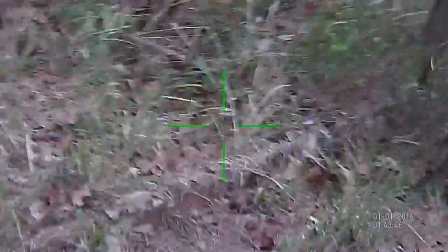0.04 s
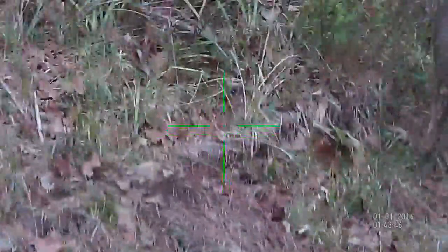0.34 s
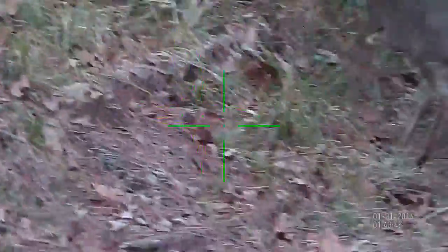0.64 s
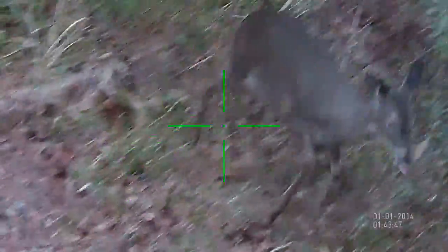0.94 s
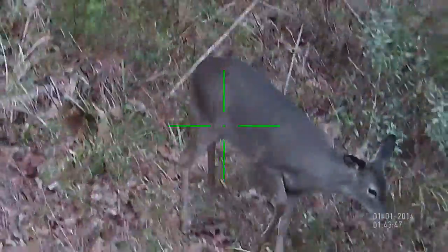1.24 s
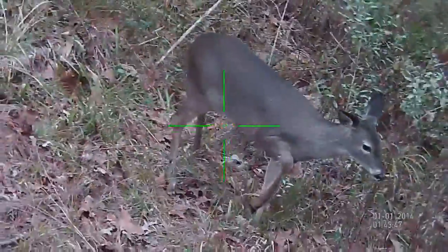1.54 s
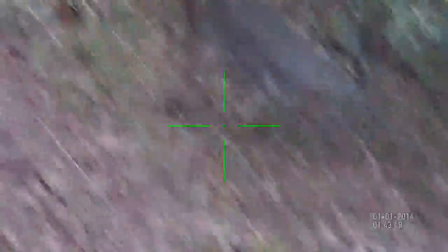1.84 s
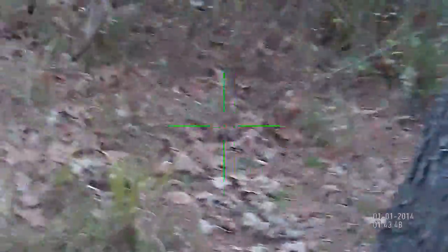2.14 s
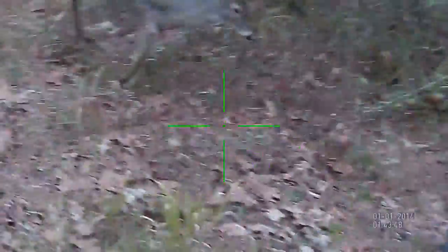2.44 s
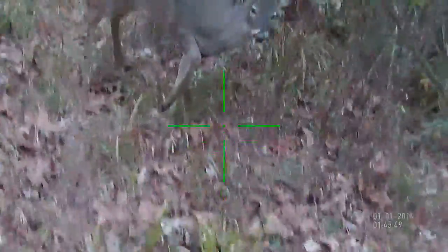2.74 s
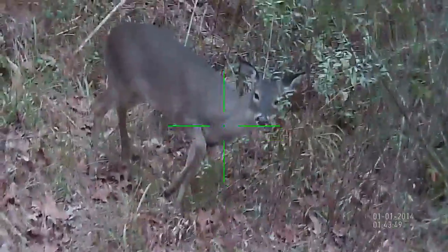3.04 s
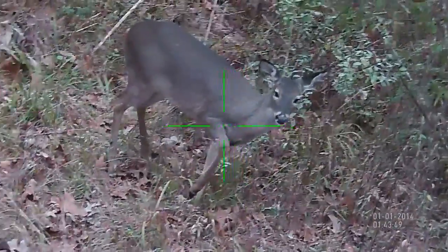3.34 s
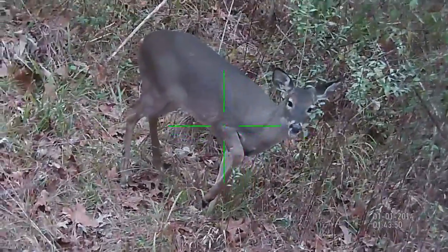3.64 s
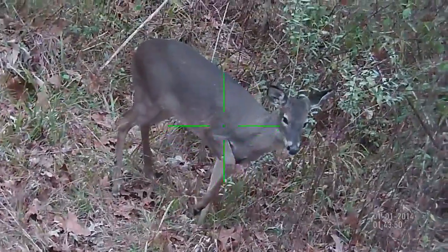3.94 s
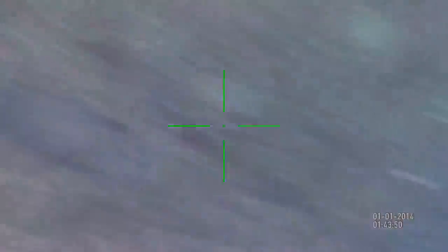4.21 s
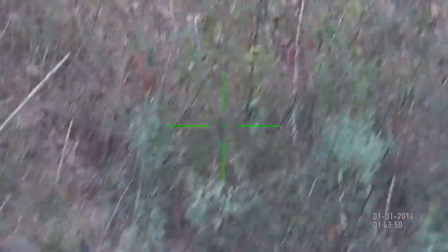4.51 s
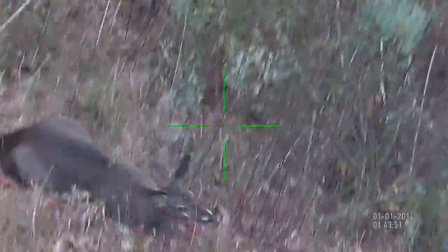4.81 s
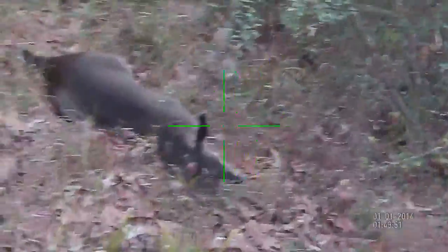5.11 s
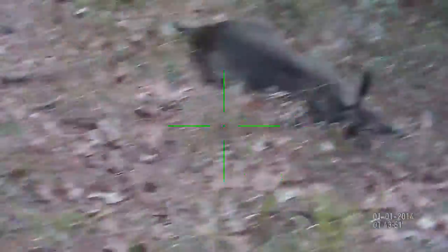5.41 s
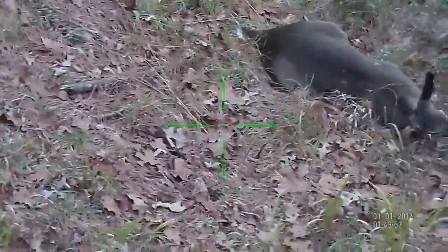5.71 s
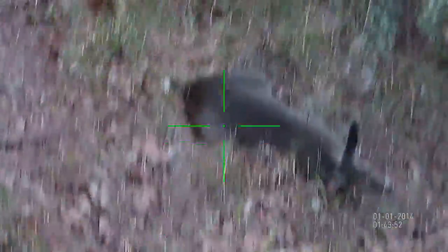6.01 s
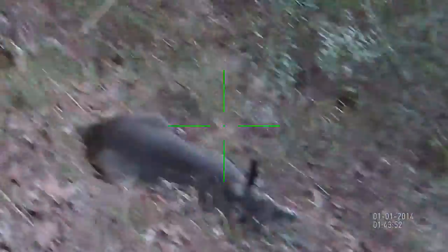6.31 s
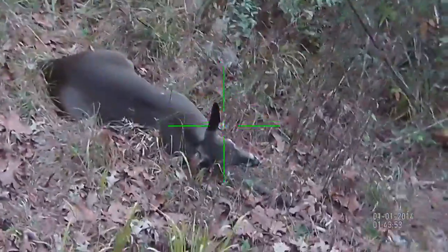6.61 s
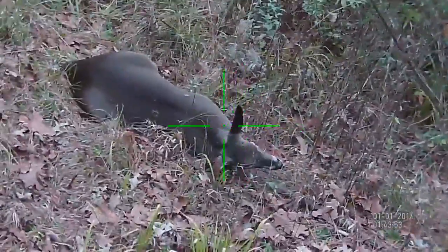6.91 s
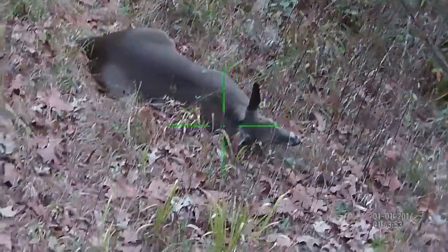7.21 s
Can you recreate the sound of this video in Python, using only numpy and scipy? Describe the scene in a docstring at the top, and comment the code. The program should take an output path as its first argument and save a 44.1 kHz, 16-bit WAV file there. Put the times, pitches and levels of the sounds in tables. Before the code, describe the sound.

A single loud rifle shot echoes through quiet woods, with faint clicks and rubs of handling before and after.

```python
"""One rifle shot in quiet woods, heard by a camera mounted on the rifle. Over still air and a faint
electronic whine, hands and sleeves tick and rub on the gun. The striker snaps, the blast overloads the
microphone and the recoil rattles the mount. The gain control ducks and recovers, so the echo from the
trees swells before it rolls away, ever duller. At the end the hands stir on the gun again."""
import sys
import numpy as np
from scipy import signal
from scipy.fft import rfft, irfft, next_fast_len
from scipy.io import wavfile
from scipy.ndimage import uniform_filter1d, map_coordinates

SR = 44100
rng = np.random.default_rng(int(sys.argv[2]) if len(sys.argv) > 2 else 0)


def waveform_to_disk(signal):
    """Save audio, clipped to [-1, 1], as 16-bit WAV at the path in sys.argv[1]."""
    frames = np.transpose(np.atleast_2d(signal))
    scaled = np.clip(frames, -1, 1) * 32767
    samples = np.round(scaled).astype(np.int16)
    wavfile.write(sys.argv[1], SR, samples)


N = 328986
SHOT_S = 4.1822

# tone of still air among the trees: f/Hz, level/dB
AIR_EQ = [(20, -25), (60, -26), (165, -21), (280, -9), (420, -15), (560, -18), (950, -18), (1300, -26),
          (2200, -32), (4000, -36), (15500, -39.5)]
# slow drift of that bed: t/s, level/dB
AIR_FADER = [(0, -63.5), (1.9, -64.5), (2.8, -66), (4.1, -65.5), (7.46, -62.5)]
# partials of the electronic whine: f/Hz, level/dB
WHINE_PARTIALS = [(1001, -75.5), (2003, -85.5), (2998, -92)]
# colour the gun's body gives every touch: f/Hz, level/dB
TOUCH_EQ = [(300, -32), (750, -25), (1150, -14.5), (1550, -14), (1950, -6.5), (2900, -13.5), (3700, -6.5),
            (5200, -6.5), (7000, -3.5), (10500, -3.5), (13000, -13), (15500, -25)]
# sharp handling ticks: t/s, level/dB, t60/s, ring f/Hz
HAND_TICKS = [(0.0998, -37.5, 0.0079, 3530), (0.1035, -37, 0.0032, 2000), (0.2137, -41, 0.028, 1900),
              (.2582, -47, 0.017, 2690), (0.3446, -46, 0.0062, 8100), (1.767, -52.5, .02, 2000),
              (1.801, -45, 0.01, 8200), (1.8174, -29, 0.0037, 1090), (1.8183, -40.5, 0.032, 1090),
              (6.074, -44.5, .02, 3460), (6.126, -45, .012, 9400), (6.454, -51, .02, 3190),
              (6.481, -45, 0.013, 3400), (6.562, -51, .045, 2000), (7.158, -50.5, .015, 3700),
              (7.2785, -39, 0.0076, 4200), (7.407, -44.5, 0.014, 2000)]
# a hand lands on the gun and slides off: t/s, level/dB, t60/s, tilt/(dB per octave)
HAND_GRIPS = [(.148, -44, .06, 3), (.952, -61.5, 0.32, 2.5), (1.31, -53, 0.16, 2.5),
              (1.968, -58.5, 0.47, -5.5), (2.335, -59, 0.12, -4), (5.802, -60, 0.34, 1),
              (7.273, -39, .035, -1.5), (7.424, -42.5, 0.059, 1.5)]
# a sleeve brushes along the gun, swelling and fading: t/s, level/dB, t60/s, tilt/(dB per octave)
SLEEVE_BRUSHES = [(.15, -57, .35, 0.5), (.203, -40, .055, 1.5), (1.19, -61.5, .15, 2),
                  (1.87, -61, 0.77, -3.5), (2.15, -58.5, 0.68, -1.5), (6.085, -55, 0.2, -10),
                  (6.9, -57, 0.15, -1), (6.98, -57, 0.2, -3), (7.143, -57, 0.073, -.5)]
# dull knocks on the stock: t/s, level/dB
STOCK_KNOCKS = [(1.8046, -31.5), (1.872, -47), (1.8762, -45.5), (4.2237, 11.5)]
# damped modes of the stock: f/Hz, level/dB, t60/s
STOCK_MODES = [(324, -3, 0.011), (524, 0, 0.009), (941, -3.5, 0.019), (1230, -7, 0.014), (2000, -11, 0.019)]
# metal hits in the action and mount: t/s, level/dB, rise/s, t60/s, tilt/(dB per octave)
METAL_CLACKS = [(4.154, -55.5, 0.0033, 0.14, -7), (4.1754, 1.5, 0.00049, 0.0091, -.5),
                (4.2112, 12, 0.00028, 0.012, 1), (4.254, 1.5, .018, 0.044, 1.5),
                (4.2594, 15, .0025, 0.016, 3.5), (4.272, 0.5, 0.00043, .016, 2),
                (4.324, -10, 0.0029, 0.06, -2)]
# tone of those steel parts: f/Hz, level/dB
STEEL_EQ = [(200, -22.5), (700, -18.5), (1300, -2.5), (2000, -3.5), (2800, -8.5), (3600, -2), (6000, -10),
            (11000, -11.5), (15500, -20)]
# tone of the muzzle blast: f/Hz, level/dB
BLAST_EQ = [(30, -39.5), (70, -17.5), (400, -6), (750, -12.5), (1200, -9.5), (2200, -5), (2800, -13.5),
            (4300, -9), (5700, -13.5), (7300, -7.5), (8200, -2.5), (9100, -8), (10300, -6), (15500, -19)]
# tone of the echo before distance dulls it: f/Hz, level/dB
ECHO_EQ = [(60, -47), (120, -28.5), (170, -13), (230, -2), (430, 2.5), (600, -0.5), (740, -4.5),
           (1000, -0.5), (1350, -4.5), (2100, -2), (4000, -4), (8000, 2), (12000, -0.5), (15500, -18.5)]
# self-noise of each channel, mostly rumble: f/Hz, level/dB
RUMBLE_EQ = [(20, 0), (35, -3), (60, -11), (200, -23), (1000, -37), (2000, -41), (15000, -42)]


def amp(db):
    """Decibels to gain."""
    return 10 ** (np.asarray(db) / 20)


def unit(x):
    """x at rms 1."""
    return x / np.sqrt(np.mean(x ** 2) + 1e-20)


def clock():
    """The time of every sample."""
    return np.arange(N) / SR


def coloured(x, eq, tilt_db=0):
    """x through an EQ curve, tilted by tilt_db per octave above 500 Hz, at rms 1."""
    hz = np.fft.rfftfreq(len(x), 1 / SR)
    eq_hz, eq_db = np.transpose(eq)
    curve_db = np.interp(np.log(hz + 1), np.log(eq_hz), eq_db)
    gain = amp(curve_db + tilt_db * np.log2(np.maximum(hz, 500)))
    return unit(irfft(rfft(x) * gain, len(x)))


def noise(eq, size, tilt_db=0):
    """Coloured noise of rms 1."""
    return coloured(rng.standard_normal(size), eq, tilt_db)


def add(track, s, sound):
    """Mix a sound into the track from time s."""
    part = track[max(round(s * SR), 0):][:len(sound)]
    part += sound[:len(part)]


def add_contact(track, eq, s, db, rise, t60, tilt_db, ring_hz, ring_db=9, q=11):
    """A contact: noise that swells to its level at time s, dies away and rings the touched part."""
    lead = min(3 * rise, s)
    t = np.arange(next_fast_len(int((lead + t60) * SR) + 512)) / SR - lead
    envelope = np.exp(-(np.minimum(t, 0) / rise) ** 2 - np.log(1000) * np.maximum(t, 0) / t60)
    touch = envelope * noise(eq, len(t), tilt_db)
    ring = signal.lfilter(*signal.iirpeak(ring_hz, q, fs=SR), touch)
    level = amp(db) * np.sqrt(np.mean(envelope ** 2))
    add(track, s - lead, level * unit(touch + amp(ring_db) * ring))


def forest_air():
    """Still air among the trees: a soft noise bed that drifts in level."""
    return amp(np.interp(clock(), *np.transpose(AIR_FADER))) * noise(AIR_EQ, N)


def whine(first_gap_s=0.81, gap_length_s=0.062):
    """A thin tone from the electronics that drops out once a second."""
    t = clock()
    gate = uniform_filter1d(((t - first_gap_s) % 1 > gap_length_s) * 1., size=300)
    return gate * sum(np.sqrt(2) * amp(db) * np.sin(2 * np.pi * hz * t) for hz, db in WHINE_PARTIALS)


def fidgets(count=10, swing_s=1.0, db=-66, t60=0.26, tilt_db=2.5):
    """Cues for faint sleeve brushes, loosely spread over the opening swing of the gun onto its mark."""
    times = swing_s * (np.arange(count) + rng.random(count)) / count
    return [(s, db, t60, tilt_db) for s in times]


def handling(hard_tick_s=0.003, grit_db=3):
    """Hands and sleeves on the gun: small ticks, and rubs made gritty by cloth catching and slipping."""
    ticks, rubs = np.zeros(N), np.zeros(N)
    for s, db, t60, ring_hz in HAND_TICKS:
        tilt_db = -2 * np.log2(t60 / hard_tick_s)  # a longer contact is duller
        add_contact(ticks, TOUCH_EQ, s, db, rise=0.0002, t60=t60, tilt_db=tilt_db, ring_hz=ring_hz)
    # A hand that stays in contact damps the ring; cloth hardly wakes it.
    for s, db, t60, tilt_db in HAND_GRIPS:
        add_contact(rubs, TOUCH_EQ, s, db, rise=0.0012, t60=t60, tilt_db=tilt_db,
                    ring_hz=2000, ring_db=-3.5, q=4)
    for s, db, t60, tilt_db in list(SLEEVE_BRUSHES) + fidgets():
        add_contact(rubs, TOUCH_EQ, s, db, rise=0.22 * t60, t60=t60, tilt_db=tilt_db,
                    ring_hz=3600, ring_db=-8, q=4.6)
    catches = unit(uniform_filter1d(rng.standard_normal(N), size=40))
    return ticks + rubs * unit(amp(grit_db * catches))


def stock_knocks():
    """Blows on the stock ring its damped modes, which alternate in polarity."""
    track, t = np.zeros(N), np.arange(SR // 10) / SR
    knock = sum((-1) ** k * amp(db - 60 * t / t60) * np.sin(2 * np.pi * hz * t)
                for k, (hz, db, t60) in enumerate(STOCK_MODES))
    for s, db in STOCK_KNOCKS:
        add(track, s, amp(db) * knock)
    return track


def metal_clacks():
    """Steel on steel: the trigger, the striker's snap, then the rattle of recoil."""
    track = np.zeros(N)
    for clack in METAL_CLACKS:
        add_contact(track, STEEL_EQ, *clack, ring_hz=2120, ring_db=-4, q=6)
    return track


def muzzle_blast(attack_s=0.0012, hold_s=0.0042, core_t60=0.012, scatter_t60=0.07, push_s=0.00038):
    """A push of pressure and its suction, inside a violent noise burst that the nearby ground scatters."""
    age = np.maximum(clock() - SHOT_S, 0)
    attack = np.minimum(age / attack_s, 1)
    core = amp(27.5 - 60 * np.maximum(age - hold_s, 0) / core_t60)
    scatter = amp(13 - 60 * age / scatter_t60)
    roar = attack * np.hypot(core, scatter) * noise(BLAST_EQ, N)
    pulse_age = age / push_s
    punch = amp(6) * pulse_age * (2 - pulse_age) * np.exp(-pulse_age)
    return roar + punch


def tree_echo(db=-1.63, build_db=6.5, build_s=0.41, plateau_s=0.33, loss_db_per_s=8, loss_limit_db=21.5):
    """Countless trunks return the blast; later echoes have come further and lost more treble and bass."""
    # Groups of trees send back clumps of uneven strength, 170 a second.
    clumps = map_coordinates(rng.standard_normal(N // 20), [clock() * 170])
    returns = coloured(rng.standard_normal(N) * amp(0.88 * clumps), ECHO_EQ)
    hz, t, spectrum = signal.stft(returns, SR, nperseg=512)
    age = np.maximum(t - SHOT_S, 0)
    # The tail builds as the blast reaches more trees, then thins out as a power of its age.
    onset_db = -build_db * np.maximum(1 - age / build_s, 0)
    spreading = np.hypot(1, age / plateau_s) ** -1.711
    # The loss at 1 kHz grows with the path, and levels off for echoes that travel over the treetops.
    loss_db = loss_limit_db * np.tanh(loss_db_per_s * age / loss_limit_db)
    # Air and leaves take the treble, the soft ground takes the bass: a hollow roll is left.
    absorption = (hz / 1000) ** 0.87 + 1.1 * np.exp(-hz / 150)
    fade = spreading * amp(db + onset_db - absorption[:, None] * loss_db)
    tail = signal.istft(spectrum * fade, SR, nperseg=512)[1][:N]
    return (clock() > SHOT_S) * tail


def scene():
    """The shot, the handling and the quiet bed: one microphone feeds both channels."""
    shot = muzzle_blast() + tree_echo() + metal_clacks()
    mono = shot + stock_knocks() + handling() + forest_air() + whine()
    return np.array([mono, mono])


def gain_control(x, depth_db=24, release_db_per_s=58, attack_s=0.015):
    """Overload ducks the gain over the attack time; it then climbs steadily back."""
    power = uniform_filter1d(x[0] ** 2, size=44)
    overload_db = np.clip(10 * np.log10(np.abs(power) + 1e-12), 0, depth_db)
    climb_db = release_db_per_s * clock()
    held_db = np.maximum.accumulate(overload_db + climb_db) - climb_db
    window = np.ones(int(attack_s * SR))
    duck_db = signal.fftconvolve(held_db, window / len(window))[:N]
    return x * amp(-duck_db)


def record(dry, ceiling=0.82, low_cut_hz=55, rumble_db=-69, high_cut_hz=15800):
    """The camera's chain: gain control too slow for the blast, clipping, low cut, rumble, high cut."""
    clipped = np.clip(gain_control(dry), -ceiling, ceiling)
    thinned = signal.sosfilt(signal.butter(2, low_cut_hz, "highpass", fs=SR, output="sos"), clipped)
    rumble = amp(rumble_db) * np.array([noise(RUMBLE_EQ, N), noise(RUMBLE_EQ, N)])
    return signal.sosfiltfilt(signal.butter(16, high_cut_hz, fs=SR, output="sos"), thinned + rumble)


dry = scene()
out = record(dry)
waveform_to_disk(out)
```